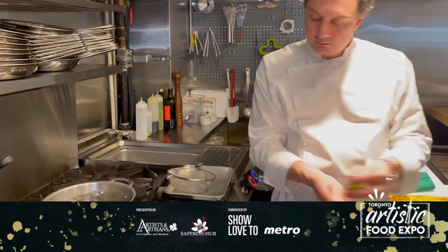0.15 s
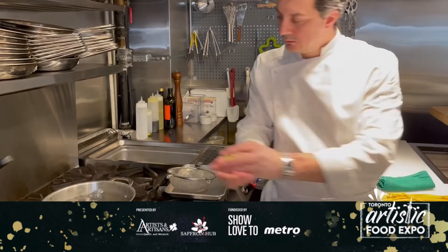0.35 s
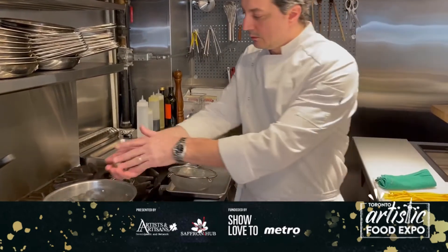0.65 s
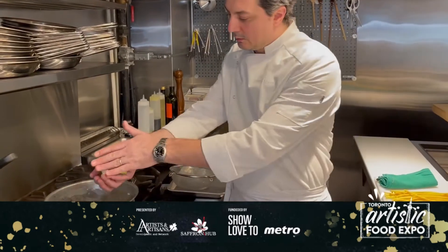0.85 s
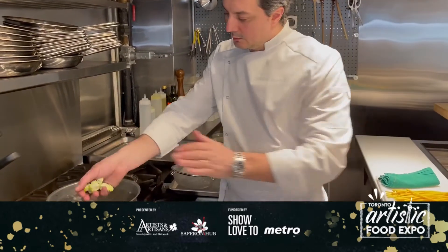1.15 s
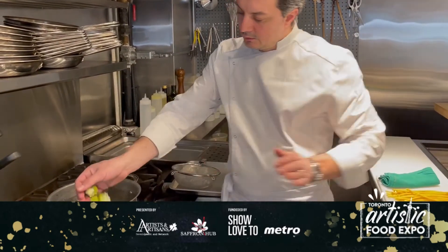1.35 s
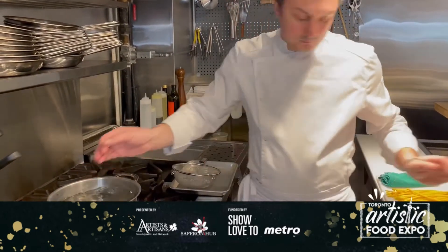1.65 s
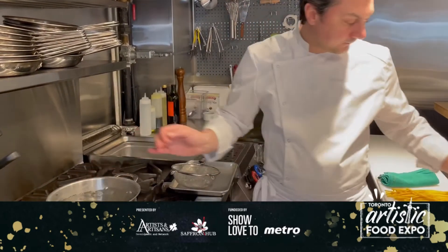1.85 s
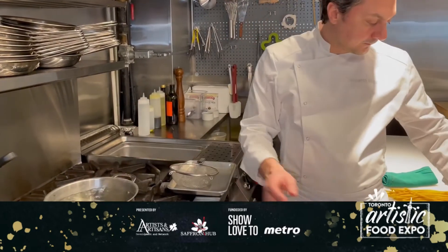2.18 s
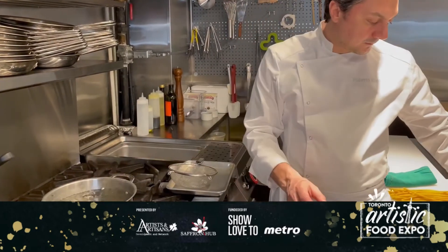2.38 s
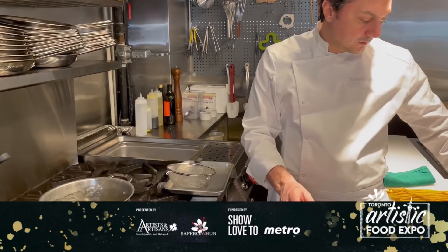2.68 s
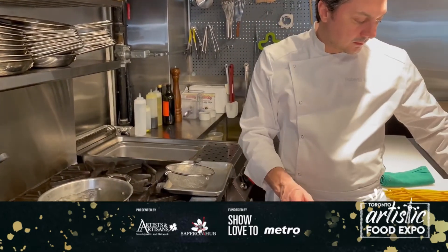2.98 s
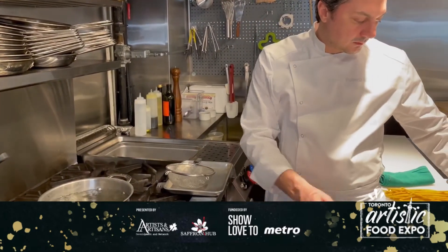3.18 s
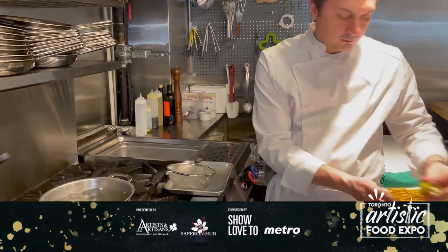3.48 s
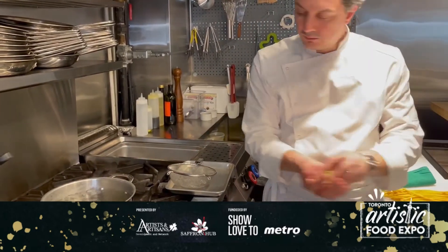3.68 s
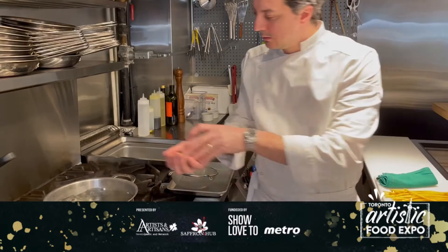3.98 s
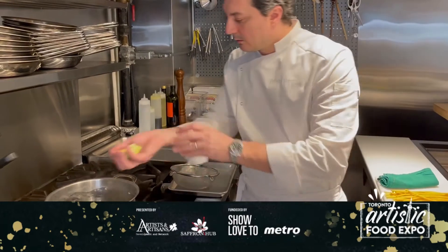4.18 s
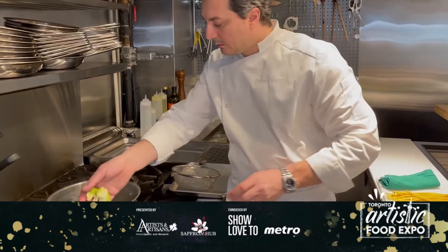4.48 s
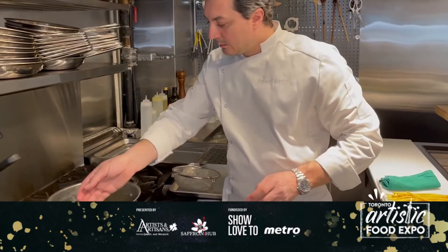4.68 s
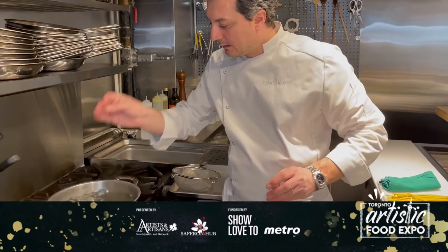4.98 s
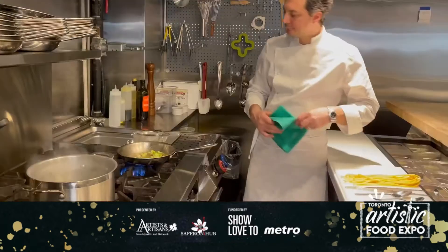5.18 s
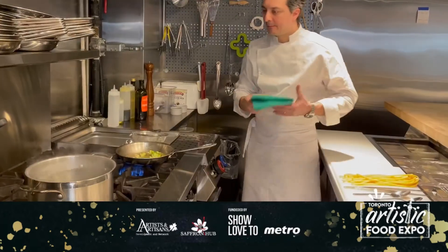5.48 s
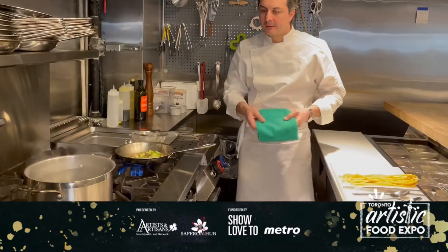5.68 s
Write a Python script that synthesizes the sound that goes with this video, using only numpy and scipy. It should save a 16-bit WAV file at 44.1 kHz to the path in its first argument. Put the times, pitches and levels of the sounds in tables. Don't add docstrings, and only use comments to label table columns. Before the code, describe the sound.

Steady low extractor fan rumble and hum in a restaurant kitchen, faint hand ticks, then an abrupt jump to louder, whistling airflow near the end.

```python
import sys
import numpy as np
from scipy import signal
from scipy.fft import rfft, irfft, next_fast_len
from scipy.io import wavfile

SR = 44100
rng = np.random.default_rng(int(sys.argv[2]) if len(sys.argv) > 2 else 0)


def wav_record(signal):
    frames = np.transpose(np.atleast_2d(signal))
    bounded = np.clip(frames, -1, 1)
    quanta = np.round(bounded * 32767).astype(np.int16)
    wavfile.write(sys.argv[1], SR, quanta)


def voltage_ratio(level):
    return 10 ** (np.asarray(level, float) / 20)


N = 257984
T = np.arange(N) / SR
CUT_S, CUT_FADE_S = 5.09, 0.01
LEAK_S, JUMP_S = 5.02, 5.095


def rms_one(x):
    return x / np.sqrt(np.mean(x ** 2) + 1e-20)


def in_time(rows):
    s, *columns = np.transpose(rows)
    return [np.interp(T, s, column) for column in columns]


def after(s):
    return np.clip((T - s) / CUT_FADE_S + .5, 0, 1)


def swell(s, length):
    return np.cos(np.pi * np.clip((T - s) / length, -.5, .5))


def drift(rate):
    coarse = 40
    r = np.exp(-2 * np.pi * rate * coarse / SR)
    noise = rng.standard_normal(N // coarse + 2002)
    slow = signal.lfilter([1], [1, -2 * r, r * r], noise)[2000:]
    return np.interp(np.arange(N) / coarse, np.arange(len(slow)), rms_one(slow))


def turning(hz, wobble_hz):
    return 2 * np.pi * np.cumsum(hz + wobble_hz * drift(7.45)) / SR


def ports(mid, side):
    return np.array([mid + side, mid - side])


def air(spectrum, gust_db, flicker_db, flicker_rate=13.0):
    size = next_fast_len(N)
    hz = np.arange(size // 2 + 1) * SR / size + 1e-3
    points = np.array(spectrum)
    inside = (hz > points[0, 0]) & (hz < points[-1, 0])
    colour = voltage_ratio(np.interp(np.log(hz), np.log(points[:, 0]), points[:, 1])) * inside
    coloured = rfft(rng.standard_normal(size)) * colour
    out, gust = 0, drift(2.15)
    for octave in range(5, 15):
        share = np.cos(np.pi / 2 * np.clip(np.log2(hz) - octave, -1, 1)) ** 2
        band = irfft(coloured * share, size)[:N]
        out = out + band * voltage_ratio(gust_db * gust + flicker_db * drift(flicker_rate))
    return rms_one(out)


def stove_flow():
    # (frequency [Hz], density [dB per Hz])
    mid_colour = [(14, -35), (42, -30), (55, -9.5), (90, -8.5), (105, -13), (146, -9.5), (230, -12.5),
                  (690, -21), (1420, -31.5), (1560, -36.5), (5300, -43.5), (5480, -47.5), (7400, -52.5),
                  (8200, -59.5)]
    # (frequency [Hz], density [dB per Hz])
    side_colour = [(25, -24), (96, -7), (124, -3), (293, -4.5), (567, -6.5), (770, -8.5), (1500, -18),
                   (4300, -26), (5330, -23), (5500, -30), (6620, -32), (7600, -36), (11300, -39),
                   (12800, -50)]
    mid = air(mid_colour, gust_db=0.56, flicker_db=1.0)
    side = air(side_colour, gust_db=0.1, flicker_db=0.8)
    return voltage_ratio(-41) * ports(mid, voltage_ratio(-9) * side)


def hood_flow():
    # (frequency [Hz], density [dB per Hz])
    mid_colour = [(14, -46), (42, -14), (64, -0.5), (100, -1), (300, -7.5), (450, -6.5), (900, -12),
                  (1600, -19.5), (2150, -26.5), (3250, -26.5), (3450, -31.5), (5350, -37.5), (5500, -41),
                  (6500, -38.5), (8250, -45.5)]
    # (frequency [Hz], density [dB per Hz])
    side_colour = [(25, -36), (69, -14), (124, -2.5), (286, -9), (378, 1), (895, -9), (1490, -10.5),
                   (2400, -20.5), (3300, -22), (5300, -31), (5550, -27), (7500, -35), (11300, -39),
                   (12800, -48)]
    mid = air(mid_colour, gust_db=.1, flicker_db=1.3, flicker_rate=35.0)
    side = air(side_colour, gust_db=.3, flicker_db=.7)
    return voltage_ratio(-34.5) * ports(mid, voltage_ratio(-6.5) * side)


def boom():
    # (centre time [s], peak level [dB], length [s])
    swells = [(0.083, -38.5, 0.34), (0.445, -38, 0.38), (0.758, -45, 0.35), (1.091, -36, 0.33),
              (1.446, -40.5, 0.49), (1.688, -43, 0.12), (1.818, -38, 0.18), (2.128, -40.5, 0.58),
              (2.408, -42, 0.1), (2.685, -42, 0.49), (2.95, -40.5, 0.2), (3.124, -36.5, 0.16),
              (3.412, -37.5, 0.32), (3.768, -37, 0.42), (4.064, -39, 0.22), (4.253, -59, .15),
              (4.535, -41, 0.3), (4.873, -42.5, 0.45), (5.14, -36, 0.19), (5.286, -43, 0.12),
              (5.507, -38, 0.24), (5.78, -32, 0.063)]
    size = np.sqrt(2) * sum(voltage_ratio(db) * swell(s, length) for s, db, length in swells)
    phase = turning(132.3, wobble_hz=0.99)
    buzz = np.sqrt(2) * voltage_ratio(-46.5 + 1.8 * drift(4.0)) * np.sin(2 * np.pi * 120.3 * T)
    balance = voltage_ratio(np.array([[-1.1], [1.1]]))
    return size * np.sin([phase, phase + 0.037]) * balance + buzz


def blades():
    # (time [s], level [dB])
    load = [(0, -51.5), (.7, -56.5), (1.1, -54), (1.6, -55.5), (1.9, -52), (3.4, -52), (3.9, -55),
            (4.25, -56.5), (4.6, -54), (4.8, -61), (5.0, -50.5), (5.1, -58), (5.3, -52), (5.85, -60)]
    shaft_hz, shaft_depth = 13.4, 0.42
    level_db, = in_time(load)
    size = np.sqrt(2) * voltage_ratio(level_db + 0.68 * drift(5.3))
    phase = turning(706.8, wobble_hz=2.52)
    throb = 1 + shaft_depth * np.sin(2 * np.pi * shaft_hz * T)
    left = np.where(T < CUT_S, voltage_ratio(-5.5), voltage_ratio(5.0)) * np.sin(phase - .8 + 0.88 * drift(2.3))
    right = np.where(T < CUT_S, voltage_ratio(4.5), voltage_ratio(-3.0)) * np.sin(phase)
    return size * throb * np.array([left, right])


def resonances(tones):
    out = 0
    for hz, width_hz, level_db, side_db in tones:
        r = np.exp(-np.pi * max(width_hz, 1) / SR)
        section = [1, 0, -1, 1, -2 * r * np.cos(2 * np.pi * hz / SR), r * r]
        noise = rng.standard_normal((2, N + SR))
        mid, side = signal.sosfilt([section, section], noise)[:, SR:]
        out = out + voltage_ratio(level_db) * ports(rms_one(mid), voltage_ratio(side_db) * rms_one(side))
    return out


def stove_tones():
    # (frequency [Hz], width [Hz], level [dB], side against mid [dB])
    modes = [(59.8, 2.5, -54.5, -20), (266, 5, -54.5, -14), (341, 14, -55, -12), (435, 18, -60, -6),
             (585, 6, -62, -4), (781, 12, -64, -3), (828, 7, -64, -5), (870, 60, -68, -3),
             (1420, 30, -69, -8), (4170, 40, -76.5, -8), (4572, 28, -74, -8), (4625, 14, -79, -8),
             (5200, 150, -81, 6), (11640, 70, -81, -3)]
    return resonances(modes)


def hood_tones():
    # (frequency [Hz], width [Hz], level [dB], side against mid [dB])
    modes = [(268, 8, -54, -10), (372, 6, -53, -12), (936, 10, -61, -3), (1060, 10, -63, -3),
             (1315, 10, -60, -3), (1577, 12, -61, -3), (1878, 7, -62, -4), (2025, 6, -59.5, -1),
             (2105, 8, -67, -4), (2300, 14, -70, -4), (2652, 12, -68, -4), (2939, 30, -69, -4),
             (3140, 90, -67, -3), (4660, 70, -70, -8), (4200, 90, -73, -3), (5227, 90, -74, 1.5)]
    return resonances(modes)


def grille():
    # (time [s], level [dB])
    whistle = [(5.01, -75), (5.022, -55), (5.08, -59), (5.3, -59.5), (5.37, -65), (5.4, -56), (5.49, -56),
               (5.54, -51), (5.72, -51), (5.76, -57), (5.85, -51)]
    puff_hz, puff_s, puff_depth = 18.5, 5.65, .55
    level_db, = in_time(whistle)
    hz = 1972.5 - 30 * np.exp(-np.maximum(T - 5.03, 0) / .05) + 5 * drift(30)
    phase = 2 * np.pi * np.cumsum(hz) / SR
    flutter = 1 + .45 * np.sin(2 * np.pi * 52 * T + 1.2 * drift(6)) + .35 * drift(30)
    flutter = flutter * (1 + puff_depth * np.cos(2 * np.pi * puff_hz * (T - puff_s)))
    started = T >= whistle[0][0]
    return np.sqrt(2) * voltage_ratio(level_db) * flutter * started * np.sin([phase, phase + .15])


def canopy():
    # (time [s], level [dB])
    canopy_shake = [(5.04, -49), (5.13, -42), (5.18, -58), (5.29, -64), (5.33, -43), (5.42, -44),
                    (5.51, -41), (5.57, -43.5), (5.7, -39.5), (5.74, -48), (5.85, -50)]
    settling = np.exp(-np.maximum(T - JUMP_S, 0) / 0.0698)
    phase = 2 * np.pi * np.cumsum(371.5 + 70.0 * settling + 5.2 * drift(10.2)) / SR
    size = np.sqrt(2) * voltage_ratio(in_time(canopy_shake)[0] + 2.4 * drift(22))
    return after(canopy_shake[0][0]) * size * np.sin([phase, phase + 0.27])


def wavering(hz, level_db, width_hz, side_db):
    carrier = np.exp(2j * np.pi * np.cumsum(hz + 0 * T) / SR)
    mid, side = (np.real(carrier * (drift(width_hz) + 1j * drift(width_hz))) for _ in range(2))
    return voltage_ratio(level_db) * ports(mid, voltage_ratio(side_db) * side)


def duct_wall():
    # (time [s], level about its mean [dB])
    wall_shake = [(0, 1.5), (.25, 0.5), (.7, -4), (1.55, 3.5), (2.0, -5), (2.4, 2.5), (2.8, -4.5),
                  (3.5, -1), (3.9, -11), (4.4, -2.5), (4.85, 4), (5.0, -11)]
    level_db = -45 + in_time(wall_shake)[0]
    return (1 - after(JUMP_S)) * wavering(180.4, level_db, width_hz=19.2, side_db=-18.0)


def whine():
    # (time [s], level about its mean [dB], pitch shift [Hz])
    draught = [(0, -3, 4.5), (.3, -2, -20), (.8, 2.5, 0), (1.15, 0.5, -30), (1.4, -4, -20), (1.6, 2, 5),
               (1.9, -3, -10), (2.45, 1, -20), (2.65, 2, -30), (2.9, 0, 0), (3.15, -3, 0), (3.4, 1.5, 0),
               (3.85, -0.5, 0), (3.95, -5, 0), (4.35, 0, -1.5), (4.6, -6, -10), (4.97, -2, 0),
               (5.03, -1, -0.5)]
    blow_db, shift_hz = in_time(draught)
    hz = 4675 + shift_hz + 12.0 * drift(8.8)
    level_db = -68 + 1.5 * after(JUMP_S) + blow_db + 1.5 * drift(14.0)
    return wavering(hz, level_db, width_hz=28.0, side_db=-6.0)


def throbs():
    # (centre time [s], peak level [dB], length [s], frequency [Hz])
    eddies = [(.55, -53, 0.16, 66), (1.0, -49, .15, 70), (1.22, -44, 0.16, 73.7), (1.898, -44, .15, 56),
              (2.83, -49, 0.21, 62), (3.17, -47, .15, 79), (3.433, -45, 0.27, 62.1),
              (4.327, -49, 0.16, 65.3), (4.803, -43, .15, 80), (5.376, -39.5, 0.14, 75.1),
              (5.13, -51, .08, 1397), (5.407, -55, 0.09, 778), (5.57, -53, .07, 1350),
              (5.69, -51, .08, 1380), (5.62, -60, 0.095, 640), (5.3, -57, .08, 2290),
              (5.704, -60, .06, 3140), (5.12, -50, 0.18, 42.2), (5.13, -47, 0.086, 794),
              (5.16, -44, 0.14, 302), (5.22, -55, 0.15, 1605), (5.32, -44, 0.078, 515),
              (5.327, -40, 0.1, 161.4), (5.325, -55, 0.11, 1294), (5.413, -45, .1, 294.3),
              (5.422, -64, .09, 1890), (5.48, -59, .07, 2030), (5.577, -46, 0.065, 292),
              (5.696, -43, 0.085, 266), (5.72, -61, .07, 1745), (5.795, -39.5, 0.082, 266.3),
              (5.808, -56, 0.063, 762), (5.44, -45, .07, 560), (5.504, -46, .06, 629),
              (5.51, -40, 0.047, 195), (5.43, -43, .06, 281), (5.58, -49, .06, 772),
              (5.65, -51, 0.055, 1004), (3.407, -64.5, .2, 4572), (3.6, -66, .2, 4570),
              (3.848, -70, .1, 4570), (5.045, -62, .06, 4210), (4.94, -68, .1, 4130),
              (5.066, -42, .05, 120), (5.13, -56, .07, 1050)]
    out, wobble = 0, drift(11.4)
    for s, db, length, hz in eddies:
        bend = 1 + 0.00586 * wobble * min(1, 700 / hz)
        phase = 2 * np.pi * hz * np.cumsum(bend) / SR + rng.uniform(0, 2 * np.pi)
        out = out + np.sqrt(2) * voltage_ratio(db) * swell(s, length) * np.sin([phase, phase + 0.15])
    return out


def hiss():
    # (frequency [Hz], density [dB per Hz])
    stove_colour = [(6800, -14), (7600, -17), (8300, 1), (10100, 0), (11300, 5.5), (12200, -1.5),
                    (13900, 0), (15000, -3), (15700, -14)]
    # (frequency [Hz], density [dB per Hz])
    hood_colour = [(6800, -25), (7600, -2), (8300, 4), (10100, 1), (11000, 2), (11500, 4), (12200, -3),
                   (13800, 1.5), (15000, -2), (15700, -7)]
    # (frequency [Hz], left lead [radians])
    left_lead = [(7000, 4.2), (8600, 3.48), (9400, 2.25), (10500, 1.64), (11640, 1.63), (12400, .4),
                 (13000, .02)]
    stove_db, hood_db = -67, -58.5
    opened = .5 * (after(LEAK_S) + after(JUMP_S))
    level_db = stove_db + (hood_db - stove_db) * opened + 0.55 * drift(0.71)
    by_stove = np.sqrt(1 - opened) * air(stove_colour, gust_db=1.0, flicker_db=1.0)
    by_hood = np.sqrt(opened) * air(hood_colour, gust_db=0.3, flicker_db=0.7)
    spatter = voltage_ratio(level_db + 0.53 * drift(60)) * (by_stove + by_hood)
    size = next_fast_len(N)
    lead = np.interp(np.arange(size // 2 + 1) * SR / size, *np.transpose(left_lead))
    return irfft(rfft(spatter, size) * np.exp([.5j * lead, -.5j * lead]), size)[:, :N]


def handling():
    # (time [s], peak level [dB], centre [Hz], width [octaves])
    dry_ticks = [(.008, -50, 13900, .15), (.6635, -63, 12500, .8), (.7219, -60, 12500, .8),
                 (1.4224, -45.5, 12800, 0.38), (1.4255, -46, 4500, 1.5), (1.499, -49, 4950, 0.41),
                 (1.897, -54, 12400, .8), (3.482, -54, 13530, .5), (3.72, -54, 6264, .33),
                 (4.239, -59, 13500, .6), (4.268, -61, 13500, .6), (4.934, -57, 12500, .86)]
    # (time [s], peak level [dB], centre [Hz], width [octaves], 60 dB decay [s])
    rustles = [(.002, -42, 4560, 0.48, 0.095), (.02, -51, 4600, 0.36, 0.23), (.13, -66, 13000, .7, 0.48),
               (1.43, -61, 12800, .51, .3), (1.9, -63, 12400, .8, 0.4), (2.06, -62, 5210, .2, .15),
               (2.2, -60, 13600, .5, 0.21), (2.81, -63, 10980, 1.9, 0.35), (2.81, -43.5, 890, .24, 0.32),
               (4.915, -46.5, 1110, 0.74, 0.33), (5.018, -50, 1960, 0.058, 0.22),
               (5.03, -52, 2400, .1, 0.26), (5.07, -55, 2420, .08, 0.16), (5.03, -60, 3300, .4, .3),
               (5.03, -56, 4300, 0.55, 0.23), (5.092, -47, 1300, 0.9, 0.7), (5.12, -55, 11040, 1.6, 0.48)]
    rows = [(*row, .002, .045) for row in dry_ticks]
    rows += [(*row[:4], 0.019 * row[4], row[4]) for row in rustles]
    size = SR // 2
    out, age = np.zeros((2, N + SR)), np.arange(size) / SR
    for s, peak_db, hz, octaves, rise, t60 in rows:
        edges = np.clip(hz * 2 ** (octaves * np.array([-.5, .5])), 100, .45 * SR)
        band = signal.butter(2, edges, "band", fs=SR, output="sos")
        mid, side = signal.sosfilt(band, rng.standard_normal((2, size)))
        shape = (1 - np.exp(-age / rise)) ** 2 * voltage_ratio(peak_db - 60 * age / t60)
        start = round(s * SR)
        out[:, start:start + size] += shape * ports(rms_one(mid), 0.9 * rms_one(side))
    return out[:, :N]


def shelves():
    # (frequency [Hz], width [Hz], level [dB], side against mid [dB])
    shelf_modes = [(1683, 50, -75.5, -2), (1877, 60, -77, -4), (2218, 120, -73.5, -4), (2753, 38, -77, -4),
                   (3093, 57, -76, -4), (3820, 60, -82, -6), (4730, 14, -78.5, -5), (4900, 90, -82.5, -4),
                   (372, 12.7, -58.5, -11)]
    return resonances(shelf_modes)


def scene():
    arriving = after(LEAK_S) * voltage_ratio(-12.5 * (1 - after(JUMP_S)))
    leaving = np.clip((CUT_S - T) / CUT_FADE_S + .5, 0, 1)
    by_stove = leaving * (stove_flow() + stove_tones() + shelves())
    by_hood = arriving * hood_flow() + (1 - leaving) * hood_tones()
    fan = boom() + blades()
    shaken = canopy() + duct_wall() + whine() + throbs()
    return by_stove + by_hood + fan + grille() + shaken + hiss() + handling()


def housing(mid, side):
    # (frequency [Hz], mid level [dB], side level [dB], lead share of the sum [ratio])
    response = [(566, 0, -0.5, -0.024), (640, -1.5, 2, 0), (734, 0.5, -2, 0), (764, -2.5, 0, 0),
                (835, -1, -0.5, -.04), (905, -3, -1.5, -.05), (1070, -1.24, 1, 0), (1600, 0, -1, .05),
                (2200, -0.1, 1, .15), (2580, -1.25, -0.3, -.18), (3560, -1.4, -1, -.22),
                (4170, 0.1, -0.5, .1), (4460, 0.4, -3, -.1), (4950, 1.5, .3, -.2), (5330, 2, .7, -0.17),
                (5450, -3, -6, .03), (5850, -0.5, -2, .25), (6500, -0.1, -3, .22), (7380, 0.5, 2, .25),
                (7500, -7.5, 1, 0), (8250, 3.5, -1.5, 0), (9250, -1, -1.2, 0), (10300, 0.8, 1.5, 0),
                (11000, 0, 0, 0)]
    size = next_fast_len(N)
    bins = np.arange(size // 2 + 1) * SR / size
    hz, *columns = np.transpose(response)
    mid_db, side_db, lead = (np.interp(bins, hz, column) for column in columns)
    shared = rfft(mid, size) * voltage_ratio(mid_db)
    differing = rfft(side, size) * voltage_ratio(side_db) - 1j * lead * shared
    return irfft([shared, differing], size)[:, :N]


def roll_off(x):
    return signal.sosfilt(signal.butter(12, 15720, fs=SR, output="sos"), x)


def record(dry):
    right_lead_s, null_hz, null_width_hz = 9e-5, 8650, 900
    mid, side = (dry[0] + dry[1]) / 2, (dry[0] - dry[1]) / 2
    bass = signal.butter(1, 450, fs=SR, output="sos")
    side = side - right_lead_s * SR * signal.sosfiltfilt(bass, np.gradient(mid))
    mid, side = housing(mid, side)
    edges = [null_hz - null_width_hz / 2, null_hz + null_width_hz / 2]
    mid = signal.sosfiltfilt(signal.butter(1, edges, "stop", fs=SR, output="sos"), mid)
    side = signal.sosfiltfilt(signal.butter(5, 12500, fs=SR, output="sos"), side)
    return roll_off(ports(mid, side))


dry = scene()
out = record(dry)
wav_record(out)
```